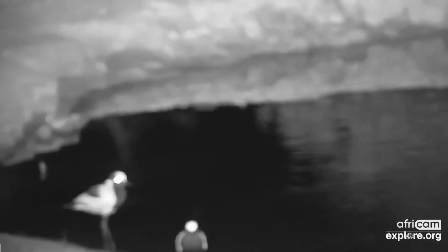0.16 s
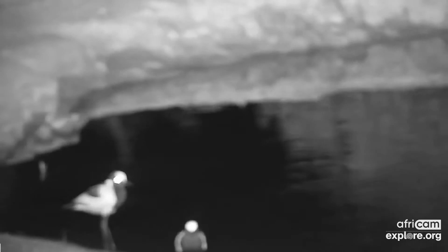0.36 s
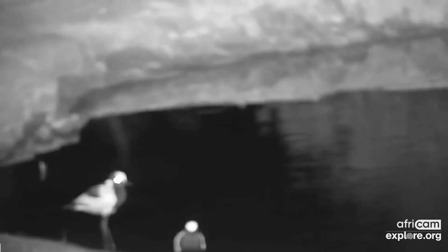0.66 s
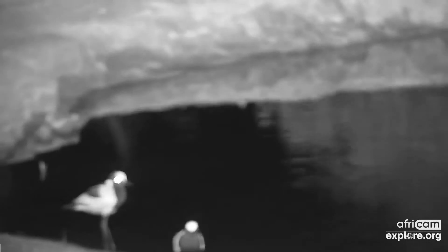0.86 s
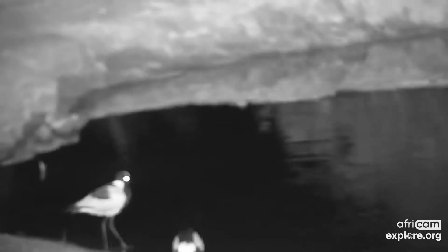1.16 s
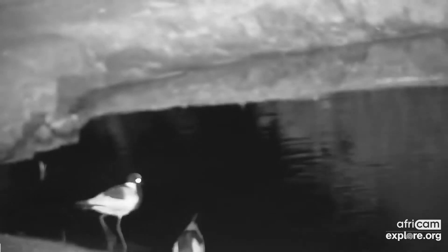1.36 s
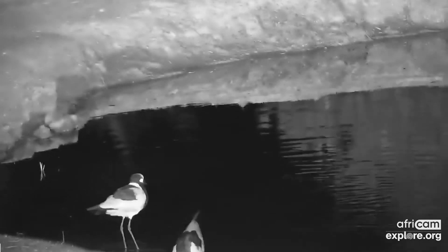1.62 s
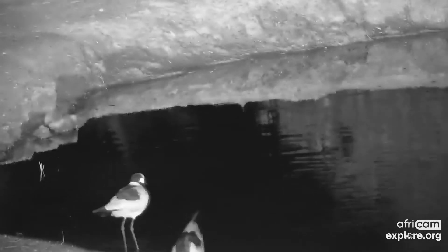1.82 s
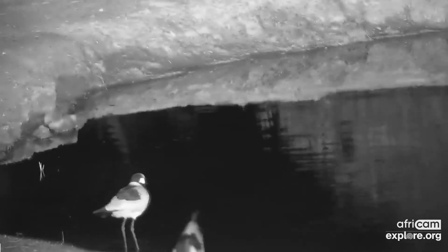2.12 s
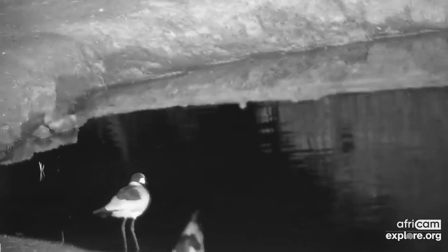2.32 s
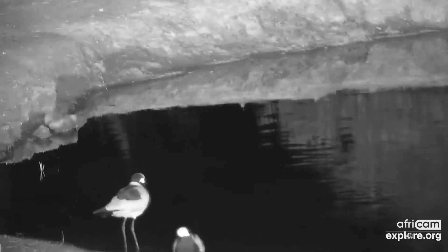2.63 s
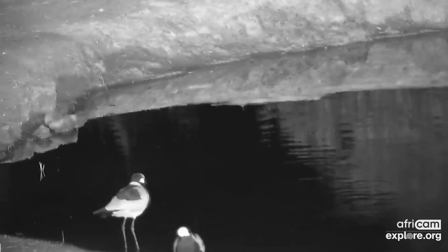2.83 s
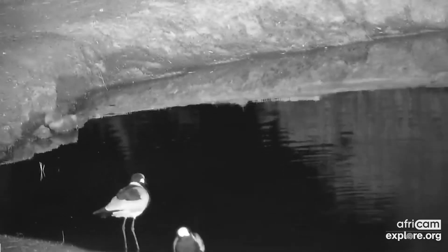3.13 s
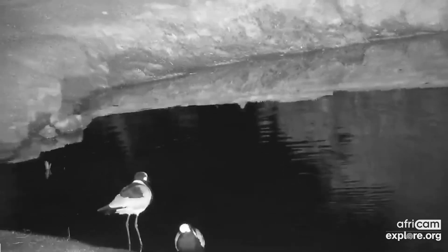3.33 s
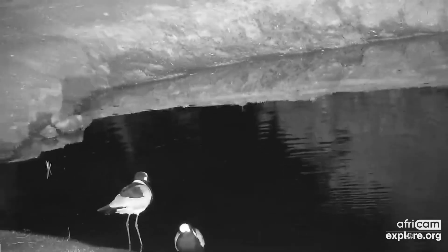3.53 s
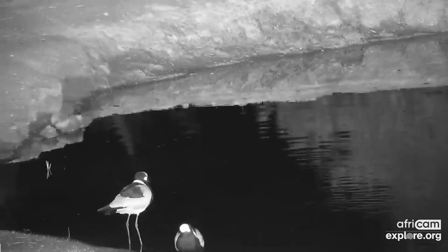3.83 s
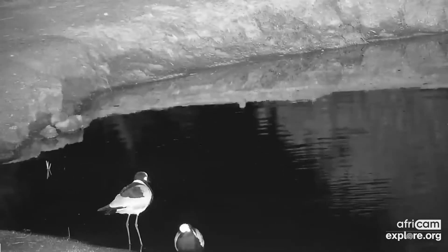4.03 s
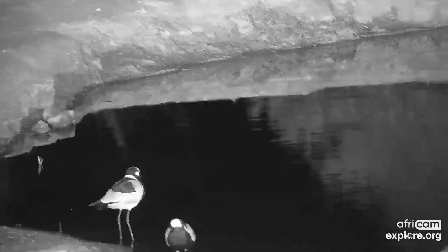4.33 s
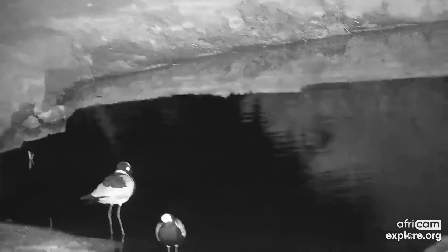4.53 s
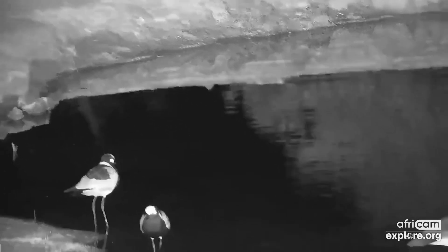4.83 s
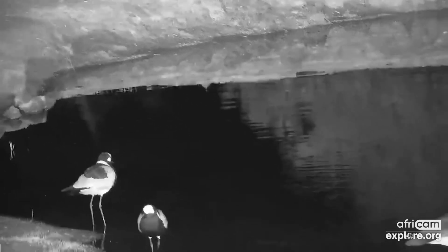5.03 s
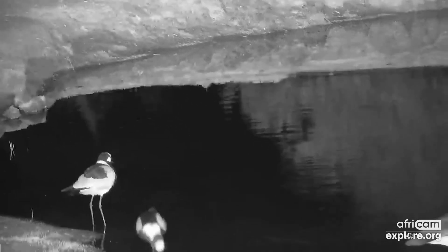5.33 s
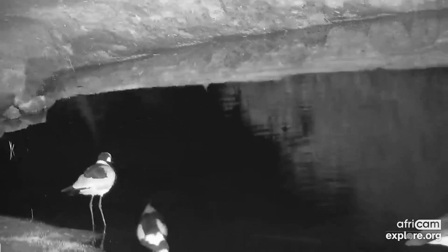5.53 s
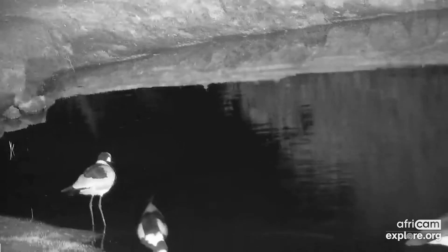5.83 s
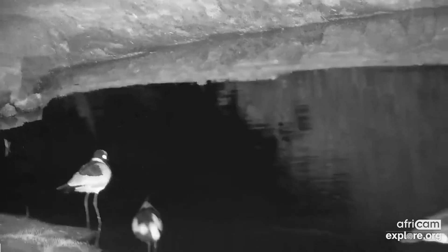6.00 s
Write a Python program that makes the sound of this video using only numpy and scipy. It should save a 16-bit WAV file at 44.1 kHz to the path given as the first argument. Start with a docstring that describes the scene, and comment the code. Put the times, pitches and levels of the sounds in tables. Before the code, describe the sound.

At a night waterhole, a fixed outdoor microphone picks up a dense, high rattling chorus of frogs, an even cricket trill and a hiss of insects over a low rumble. Faint liquid frog whoops and short insect trills dot the chorus. From about halfway, a bat gives thin paired squeaks and then quick twitters, with faint distant moans beneath. The banks and bushes add a soft echo.

```python
"""A crowd of small frogs rattles at night beside a waterhole in the bush.
Each rattle is a run of quick pulses ringing a frog's throat sac. Other frogs whoop and far toads drone.
A mole cricket trills low and katydids chirp high by rubbing their wings; smaller insects join in.
Bats squeak overhead and some far animal moans, over a low rumble and the hiss of distant insects.
One fixed microphone hears it all, along with soft echoes from the banks and bushes."""
import sys
import numpy as np
from scipy import signal
from scipy.fft import rfft, irfft
from scipy.io import wavfile
from scipy.ndimage import uniform_filter1d, map_coordinates

SR = 44100
rng = np.random.default_rng(int(sys.argv[2]) if len(sys.argv) > 2 else 0)


def digitize_waveform(pressure):
    """Quantize a signal to 16-bit integers and store it at the path in sys.argv[1].

    Rows of a 2-D input are taken as channels; values are limited to [-1, 1].
    """
    field = np.atleast_2d(pressure).T
    bounded = np.clip(field, -1, 1)
    quanta = np.round(bounded * 32767).astype(np.int16)
    wavfile.write(sys.argv[1], SR, quanta)


N = 271656
T = np.arange(N) / SR

# Levels in these tables are relative: the functions below may turn a whole layer up or down.
# The tone of the rumble, far insects, night air and katydid wings. Each row: frequency in Hz, level in dB.
RUMBLE_SPECTRUM = [(20, -49), (32, -15), (45, -6.5), (62, 1), (75, 0.5), (100, -4), (125, -11), (160, -21),
                   (240, -30.5), (500, -59)]
INSECT_SPECTRUM = [(3400, -15.5), (3850, -7), (4200, -1.5), (4650, 2.5), (5000, 0), (5250, -6),
                   (5600, -10.5), (6100, -12), (7000, -27)]
AIR_SPECTRUM = [(100, 17.5), (220, -7.5), (370, 3.5), (550, -3), (800, -15.5), (1050, -20), (1500, 2.5),
                (2200, 3), (3800, -1.5), (6200, -13), (8000, -7), (8700, -6), (9600, -12), (11000, -15.5)]
WING_SPECTRUM = [(5800, -20), (6500, 12), (6950, -5.5), (7580, -5), (7800, -2), (8150, 0), (8700, -18)]
# How loud the rumble, far insects, near katydid and frog crowd are. Each row: time in seconds, level in dB.
RUMBLE_LEVELS = [(0.0, -36), (0.12, -38), (0.33, -35.5), (0.36, -39.5), (0.67, -35), (0.74, -42),
                 (0.79, -37), (1.04, -41.5), (3.26, -43), (4.19, -38), (5.01, -40.5), (5.23, -45.5),
                 (5.28, -42), (6.04, -41), (6.07, -46.5), (6.16, -34.5)]
INSECT_LEVELS = [(0, -45), (3.1, -46.5), (3.7, -47), (4.4, -45.5), (5.2, -47), (6.16, -45)]
KATYDID_LEVELS = [(0, -50), (2.42, -48.5), (2.46, -59), (2.52, -52), (2.56, -49), (6.16, -48.5)]
CROWD_LEVELS = [(0, -35.7), (1.3, -35.8), (1.43, -41.5), (1.5, -35), (1.6, -36), (2.3, -36), (2.47, -38.5),
                (2.6, -36), (3.2, -36.3), (4.1, -34.3), (6.16, -35.2)]
# A far animal's moans. Each row: middle and length in seconds, start and end pitch in Hz, level in dB.
MOANS = [(0.07, .36, 341.7, 361.5, -47), (3.407, 0.15, 339, 356, -56), (4.254, 0.14, 350, 358, -50.5),
         (4.33, 0.5, 283, 261.7, -55), (4.48, .12, 346, 351.6, -48), (4.625, 0.21, 313, 351, -52.5),
         (4.875, .46, 350, 360, -57.5), (6.126, 0.44, 355, 318, -55)]
# Tiny dry clicks. Each row: time in seconds, level in dB.
TICKS = [(3.245, -36), (3.447, -40), (4.327, -42), (4.432, -44)]
# A tiny insect's buzzes. Each row: middle and length in seconds, level in dB.
BUZZES = [(.48, 0.71, -70.5), (1.254, 0.9, -68), (2.42, 0.82, -69.5), (3.32, 0.51, -72)]
# A small cricket's spells of song. Each row: start and end in seconds, pulses a second, pitch in Hz,
# level in dB.
CRICKET_SONGS = [(2.461, 3.42, 18, 4980, -43.5), (4.203, 4.72, 29.8, 4950, -49)]
# Short insect trills. Each row: start in seconds, number of notes, notes a second, pitch in Hz, level in dB.
TRILLS = [(1.267, 7, 53, 4720, -34), (3.202, 8, 54, 4685, -34), (4.935, 4, 48, 4710, -39),
          (1.895, 2, 63, 4150, -45), (2.696, 3, 50, 4180, -38), (3.684, 2, 39, 4220, -40),
          (4.598, 2, 42, 4240, -43), (5.449, 4, 67, 4420, -37.5)]
# A bat's pairs of squeaks. Each row: middle of the first squeak in seconds, level in dB.
SQUEAK_PAIRS = [(3.437, -39.5), (3.638, -39.5), (3.864, -40)]
# The bat's twitters. Each row: middle of the last note in seconds, level in dB.
TWITTERS = [(4.043, -38), (4.576, -39), (5.09, -40.5), (5.552, -39)]
# The notes of one twitter. Each row: seconds before the last note, change of level in dB.
TWITTER_NOTES = [(.134, -8), (.084, -2), (.037, -2.5), (.019, 2.5), (0, 0)]
# Thin high peeps. Each row: middle and length in seconds, pitch in Hz, level in dB.
PEEPS = [(2.217, 0.16, 10440, -54), (4.11, 0.13, 10800, -54.5)]
# The times, in seconds, at which the mole cricket skips a wing stroke.
SKIPPED_STROKES = [3.097, 3.119]
# Near whooping frogs. Each row: middle of the first whoop in seconds, number of whoops,
# seconds from one to the next, first and last level in dB.
WHOOPS = [(0.145, 4, .464, -50.5, -52), (0.385, 1, 0, -54, -54), (0.488, 1, 0, -56, -56),
          (1.242, 1, 0, -45.5, -45.5), (1.388, 5, .48, -54.5, -58), (2.581, 4, .451, -50.5, -59),
          (3.367, 2, .458, -54, -56), (4.237, 2, .418, -46.5, -57), (4.932, 1, 0, -57, -57),
          (5.037, 3, .411, -49.5, -55), (5.231, 3, .433, -54, -57), (5.58, 2, .418, -51, -50)]
# Near rattling frogs. Each row: middle of the first call in seconds, number of calls,
# seconds from one to the next, first and last level in dB, pitch in Hz.
RATTLES = [(0.157, 4, .998, -31.5, -39.5, 3060), (0.655, 3, 1.04, -35.5, -39.5, 3150),
           (0.86, 2, .93, -36, -37.5, 3120), (1.015, 6, 1.007, -36, -38, 3070),
           (1.3, 4, .999, -38, -34.5, 3030), (1.595, 5, .995, -39, -33.5, 3060),
           (2.405, 4, 1.002, -38.5, -38, 3120), (2.91, 4, .97, -35, -38.5, 3100),
           (4.155, 2, 1.045, -34, -34, 3110), (4.76, 2, 1.05, -32.5, -35.5, 3150)]


def undb(db):
    """Turn decibels into a number to multiply a sound by."""
    return 10 ** (np.asarray(db) / 20)


def unit(x):
    """Scale a sound so that its average strength (rms) is 1."""
    return x / np.sqrt(np.mean(x ** 2))


def steady(x, seconds):
    """Even out a sound so that its strength stays near 1."""
    size = int(seconds * SR)
    return x / np.sqrt(uniform_filter1d(uniform_filter1d(x ** 2, size), size) + 1e-12)


def follow(levels):
    """A volume curve that joins up points of time and level."""
    return undb(np.interp(T, *np.transpose(levels)))


def wander(rate):
    """A smooth random curve of strength 1 that changes rate times a second."""
    points = rng.standard_normal(1024)
    return unit(map_coordinates(points, [T * rate], order=3, mode="wrap"))


def shape(x, spectrum):
    """Turn each frequency of a sound up or down to follow a spectrum."""
    hz, db = np.transpose(spectrum)
    bins = np.maximum(np.fft.rfftfreq(N, 1 / SR), 1)
    gain = undb(np.interp(np.log(bins), np.log(hz), db, right=-120))
    return irfft(rfft(x) * gain, N)


def noise(spectrum):
    """Noise of strength 1 with the given spectrum."""
    return unit(shape(rng.standard_normal(N), spectrum))


def rasp(db):
    """A volume that flutters a few hundred times a second and roughens a tone."""
    return 1 + undb(db) * noise([(20, 0), (350, 0), (1000, -20)])


def note(length, start_hz, end_hz, phase=0):
    """A gliding tone that swells and fades; its starting phase is in cycles."""
    n = max(int(length * SR), 4)
    cycles = phase + np.cumsum(np.geomspace(start_hz, end_hz, n)) / SR
    return np.hanning(n) * np.sin(2 * np.pi * cycles)


def add(out, middle, sound):
    """Mix a sound in, centred on a time in seconds."""
    start = int(middle * SR) - len(sound) // 2
    a, b = max(start, 0), min(start + len(sound), N)
    if b > a:
        out[a:b] += sound[a - start:b - start]


def beats(rate):
    """The times of a beat whose speed follows a curve."""
    return T[1:][np.diff(np.floor(np.cumsum(rate) / SR)) > 0]


def calls(first_s, count, interval_s, first_db, last_db):
    """Times and levels of one animal's evenly spaced calls, which grow or fade steadily."""
    return zip(first_s + interval_s * np.arange(count), np.linspace(first_db, last_db, count))


def echoes(x, echo_db, fade_s):
    """A sound plus its scatter from the banks and bushes, which falls 60 dB in fade_s."""
    t = T[:SR // 2]
    tail = rng.standard_normal(len(t)) * undb(-60 * t / fade_s) * (t > .004)
    return x + undb(echo_db) * signal.fftconvolve(x, tail / np.sqrt(np.sum(tail ** 2)))[:N]


def background(air_db=-51, hum_hz=300, hum_db=-70):
    """Low rumble, the shimmer of far insects, night air and a faint hum."""
    rumble = steady(noise(RUMBLE_SPECTRUM), .083) * follow(RUMBLE_LEVELS)
    insects = noise(INSECT_SPECTRUM) * follow(INSECT_LEVELS) * undb(-1 + 1.6 * wander(130))
    air = noise(AIR_SPECTRUM) * undb(air_db + 2.3 * wander(10))
    hum = undb(hum_db) * np.sin(2 * np.pi * hum_hz * T)
    return rumble + insects + air + hum


def far_toads(db=-62, hz=694):
    """Far toads merge into a throbbing drone."""
    spectrum = [(560, -40), (hz - 35, -9), (hz - 14, 0), (hz + 10, 0), (hz + 28, -14), (820, -40)]
    return undb(db + 2 * wander(11)) * noise(spectrum)


def far_moans(overtone_db=-11):
    """Hoarse low calls with one overtone, blurred by distance."""
    out = np.zeros(N)
    for s, length, start_hz, end_hz, db in MOANS:
        overtone = undb(overtone_db) * note(length, 2 * start_hz, 2 * end_hz)
        add(out, s, undb(db) * (note(length, start_hz, end_hz) + overtone))
    hoarse = out * (1 + wander(90))
    return echoes(hoarse, echo_db=-3, fade_s=.65) / 2


def ticks(hz=10000, length_s=.0005):
    """Tiny dry clicks close to the microphone."""
    out = np.zeros(N)
    for s, db in TICKS:
        add(out, s, undb(db) * note(length_s, hz, hz))
    return out


def high_buzz(strokes_per_s=60):
    """A tiny insect's thin rasp comes and goes near 10 kHz."""
    swells = np.zeros(N)
    for s, length, db in BUZZES:
        add(swells, s, undb(db) * np.hanning(int(length * SR)))
    strokes = 1 + np.sin(2 * np.pi * strokes_per_s * T + wander(8))
    hiss = noise([(8000, -30), (9600, -10), (10400, 5), (11200, -3)])
    return swells * unit(strokes * hiss)


def small_cricket(pulse_s=.03):
    """A small cricket sings two faint spells of rough pulses."""
    out = np.zeros(N)
    for start, end, rate, hz, db in CRICKET_SONGS:
        for s in np.arange(start, end, 1 / rate):
            add(out, s, undb(db - 2 * rng.random()) * note(pulse_s, hz * 1.012, hz * .988, rng.random()))
    return echoes(out * rasp(db=-6), echo_db=-4, fade_s=.11)


def insect_trills(fall=.111, note_s=.021):
    """Now and then an insect gives a short run of notes, each sliding down."""
    out = np.zeros(N)
    for s, count, rate, hz, db in TRILLS:
        for k in range(count):
            swell = np.sqrt(np.sin(np.pi * (k + .5) / count))
            tone = note(note_s, hz * (1 + fall), hz * (1 - fall), rng.random())
            add(out, s + k / rate, undb(db) * swell * tone)
    return echoes(out * rasp(db=-15), echo_db=-12, fade_s=.14)


def bats(squeak_hz=5350, squeak_s=.031, pair_gap_s=.07, twitter_hz=5720, twitter_s=.014, fall=.092):
    """Falling squeaks in pairs, then short twitters that quicken, and two thin high peeps."""
    squeaks, peeps = np.zeros(N), np.zeros(N)
    glide = np.array([1 + fall, 1 - fall])
    for s, db in SQUEAK_PAIRS:
        for delay in (0, pair_gap_s):
            add(squeaks, s + delay, undb(db) * note(squeak_s, *(squeak_hz * glide)))
    for s, db in TWITTERS:
        for early, note_db in TWITTER_NOTES:
            add(squeaks, s - early, undb(db + note_db) * note(twitter_s, *(twitter_hz * glide)))
    for s, length, hz, db in PEEPS:
        add(peeps, s, undb(db) * note(length, hz * 1.03, hz * .97))
    squeaks *= rasp(db=-7)
    peeps *= noise([(20, -14), (250, 6), (700, -25)])  # smears each tone into a narrow hiss
    return echoes(squeaks + peeps, echo_db=-8, fade_s=.073)


def wing_chirps(chirps_per_s, hz=7480, drop_hz=85, fall=.08, stroke_s=.0068, gap_s=.0055):
    """Chirps of three wing strokes and a weak fourth, each sliding down through the wing's ringing range."""
    ring = np.zeros(N)
    times = beats(chirps_per_s * (1 + .013 * wander(3)))
    for s, chance in zip(times, rng.standard_normal((300, 4, 3))):
        for k, stroke_db in enumerate([-1.5, 0, 0, -10]):
            louder, late, phase = chance[k]
            pitch = hz - k * drop_hz
            stroke = note(stroke_s, pitch * (1 + fall), pitch * (1 - fall), phase)
            add(ring, s + (k + .06 * late) * gap_s, undb(stroke_db + 1.5 * louder) * stroke)
    return unit(shape(ring * rasp(db=-10.5), WING_SPECTRUM))


def katydids(far_db=-58):
    """One katydid near by, whose level dips briefly, and another further off in the bushes."""
    near = echoes(wing_chirps(37.6) * follow(KATYDID_LEVELS), echo_db=-11, fade_s=.12)
    far = unit(echoes(wing_chirps(35.8), echo_db=3, fade_s=.2))
    return near + undb(far_db) * far


def mole_cricket(hz=1755, strokes_per_s=91.3, stroke_s=.011, db=-38.5):
    """Each closing of the wings rings one pure pulse; twice it skips a stroke."""
    out = np.zeros(N)
    times = beats(strokes_per_s * (1 + .006 * wander(5.4)))
    for s, (louder, higher, phase) in zip(times, rng.standard_normal((700, 3))):
        if min(abs(s - skip) for skip in SKIPPED_STROKES) > .5 / strokes_per_s:
            pitch = hz * (1 + .004 * higher)
            add(out, s, undb(db + .5 * louder) * note(stroke_s, pitch, pitch, phase))
    return echoes(out, echo_db=-12, fade_s=.2)


def whooping_frogs(start_hz=1010, end_hz=1650, whoop_s=.056, far_db=-61):
    """Liquid upward whoops; those from the far bank blur into a murmur."""
    near, far = np.zeros(N), np.zeros(N)
    for frog in WHOOPS:
        for s, db in calls(*frog):
            add(near, s, undb(db) * note(whoop_s, start_hz, end_hz))
    for when, higher in rng.random(size=(220, 2)):
        add(far, when * T[-1], note(whoop_s, 1170 * (1 + .1486 * higher), 1680 * (1 + .15 * higher)))
    near = echoes(near, echo_db=-9, fade_s=.3)
    murmur = steady(echoes(far, echo_db=8, fade_s=.4), .1)
    return near + undb(far_db) * murmur


def rattle(hz, rise, length_s=.095, pulses_per_s=225, ring_s=.0052):
    """One frog call: quick pulses ring the throat sac, whose pitch climbs as it fills."""
    chance, phase = rng.standard_normal((64, 3)), rng.random(64)
    faster, late, louder = chance.T
    rate = pulses_per_s * np.exp(.18 * np.clip(faster[0], -1.5, 1.5))
    call = np.zeros(int((length_s + 2 * ring_s) * SR))
    for k in range(min(int(length_s * rate), 64)):
        progress = np.clip((k + .5 + .13 * late[k]) / (length_s * rate), 0, 1)
        pitch = hz * (1 + rise * (progress - .5))
        swell = np.sqrt(np.sin(np.pi * progress))
        pulse = note(ring_s, pitch, pitch, phase[k]) * swell * undb(.8 * louder[k])
        start = int(progress * length_s * SR)
        call[start:start + len(pulse)] += pulse
    return unit(call)


def rattling_frogs(crowd_hz=3090, spread_hz=330, crowd_calls=170, throb_hz=72, band_hz=(2620, 3540)):
    """A few near frogs call about once a second and stand out of a crowd all round the water."""
    near, crowd = np.zeros(N), np.zeros(N)
    for *frog, hz in RATTLES:
        for s, db in calls(*frog):
            add(near, s, undb(db) * rattle(hz, rise=.14))
    for k, (when, higher) in enumerate(rng.random(size=(crowd_calls, 2))):
        pitch = crowd_hz + spread_hz * (k % 2 + higher - 1)  # low and high voices take turns
        add(crowd, (k + when) / crowd_calls * T[-1], rattle(pitch, rise=.09))
    chorus = near + steady(crowd, .005) * follow(CROWD_LEVELS)
    # the pulses come in uneven bursts, loosely in step
    throb = np.sin(2 * np.pi * np.cumsum(throb_hz * (1 + .2 * wander(14))) / SR)
    chorus *= 1 + .5 * np.tanh(1.2 * wander(115) + 1.1 * throb + .65)
    # the throat sacs send out only a narrow band of pitches
    chorus = signal.sosfilt(signal.butter(4, band_hz, "band", fs=SR, output="sos"), chorus)
    return undb(-1.9) * echoes(chorus, echo_db=-17, fade_s=.3)


def scene():
    """Everything meets at one microphone."""
    frogs = rattling_frogs() + whooping_frogs() + far_toads()
    insects = mole_cricket() + katydids() + small_cricket() + insect_trills() + high_buzz()
    return (frogs + insects + bats() + far_moans() + ticks() + background())[None]


def record(dry):
    """The deepest bass and the highest treble are cut away."""
    bass_cut = signal.butter(6, 32, "high", fs=SR, output="sos")
    treble_cut = signal.ellip(10, .2, 70, 11100, fs=SR, output="sos")
    return signal.sosfilt(treble_cut, signal.sosfilt(bass_cut, dry))


dry = scene()
out = record(dry)
digitize_waveform(out)
```